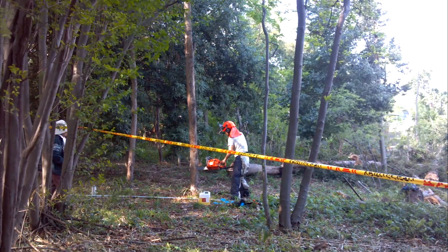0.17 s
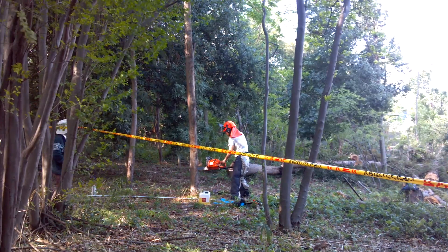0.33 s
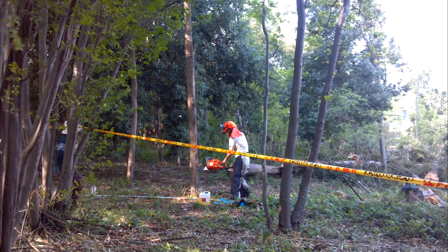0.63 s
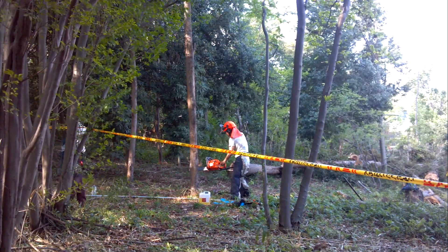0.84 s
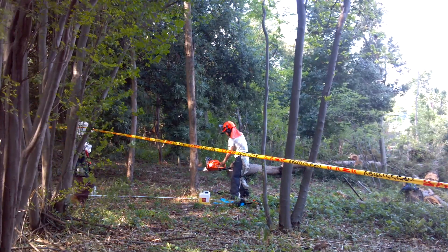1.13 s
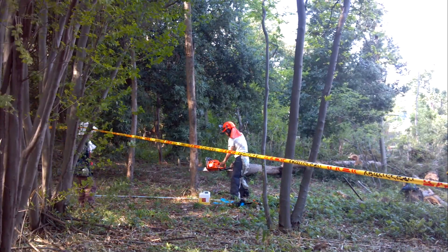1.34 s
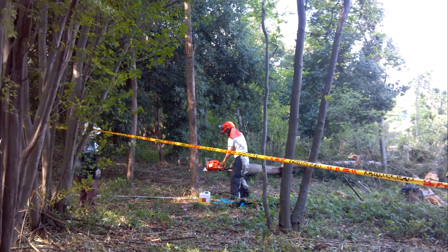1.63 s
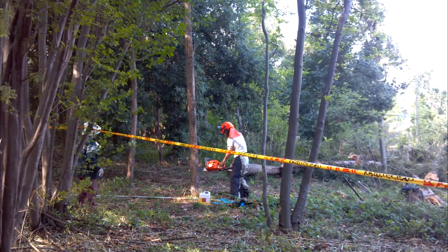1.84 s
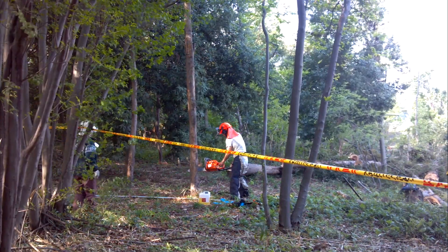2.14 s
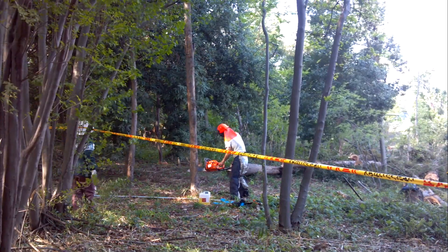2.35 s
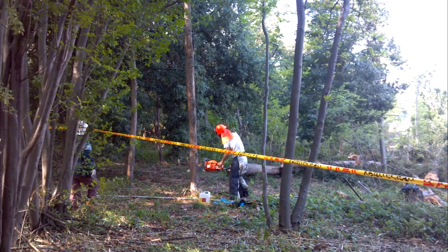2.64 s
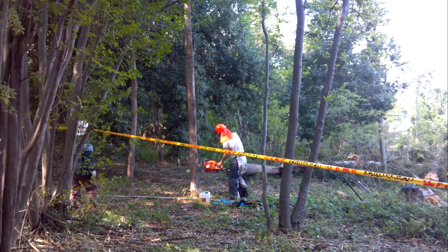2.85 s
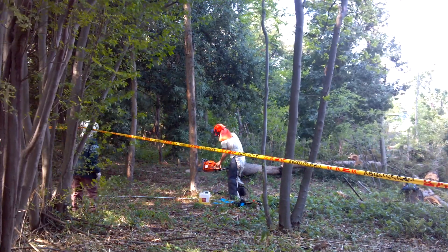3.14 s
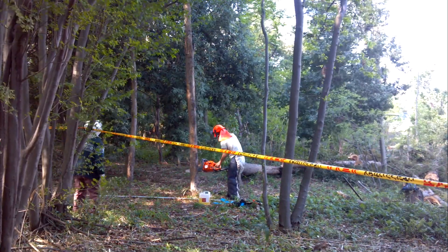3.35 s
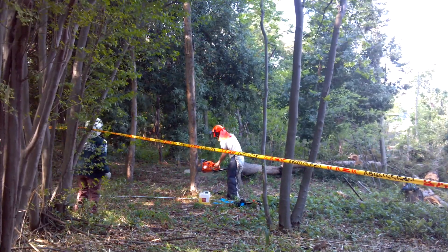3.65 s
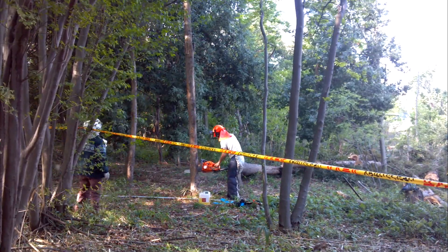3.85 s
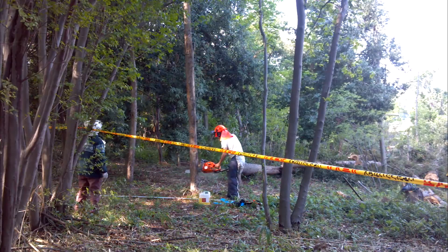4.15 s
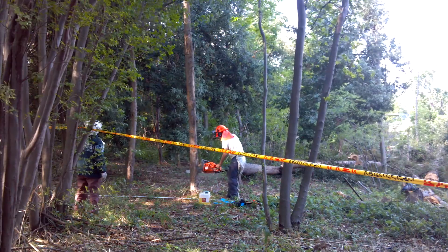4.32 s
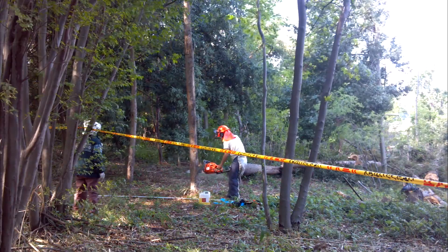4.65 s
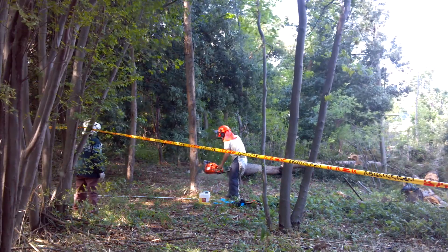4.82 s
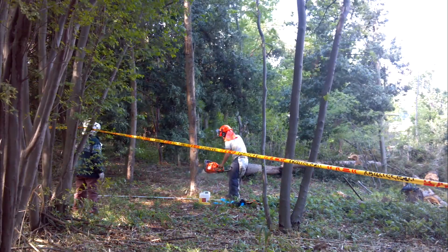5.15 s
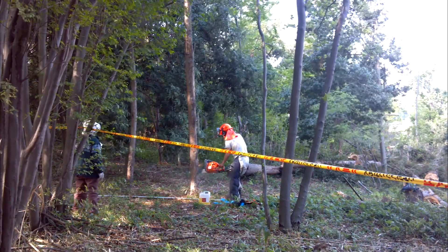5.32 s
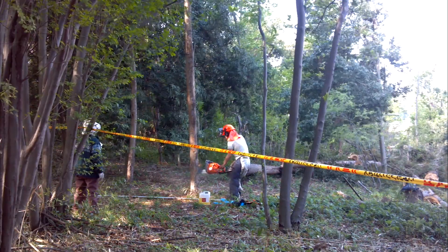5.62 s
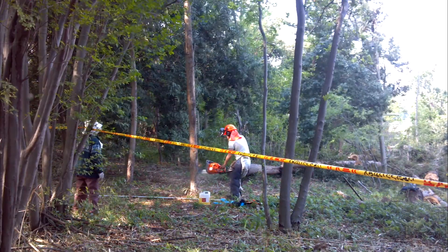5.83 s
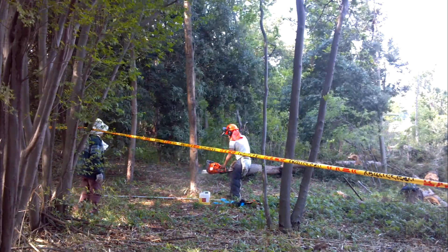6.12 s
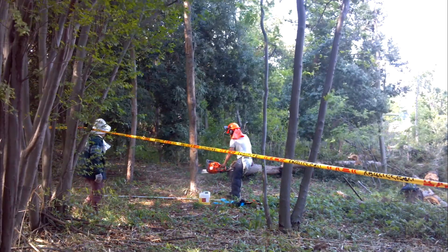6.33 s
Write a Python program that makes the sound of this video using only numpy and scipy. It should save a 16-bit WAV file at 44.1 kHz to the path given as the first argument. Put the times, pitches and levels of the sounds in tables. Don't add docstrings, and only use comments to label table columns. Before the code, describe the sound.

A small two-stroke engine pops weakly, then revs to a buzzing snarl with hissing chain. It slackens into a fluttering, stuttering burble, suddenly opens to a loud clean high scream, falls off, cracks once or twice and gives two sharp bursts. Heard from a distance among trees by a wide stereo microphone with low wind buffeting, mostly early on.

```python
import sys
import numpy as np
from scipy import signal
from scipy.fft import rfft, irfft, next_fast_len
from scipy.io import wavfile
from scipy.ndimage import uniform_filter1d, map_coordinates

SR = 44100
rng = np.random.default_rng(int(sys.argv[2]) if len(sys.argv) > 2 else 0)


def digitize_waveform(pressure):
    field = np.atleast_2d(pressure).T
    bounded = np.clip(field, -1, 1)
    quanta = np.round(bounded * 32767).astype(np.int16)
    wavfile.write(sys.argv[1], SR, quanta)


def volts(x):
    e = np.asarray(x, float) / 20
    return 10 ** e


N = 285768

# from t/s, period of firing [turns], roughness [0-1]
FIRING = [(0, 2, .6), (.3, 1, .8), (.44, 1, .15), (.85, 1, .28), (1.6, 1, .35), (1.85, 3, .22),
          (2.55, 3, .45), (2.92, 2, .18), (3.71, 1, 0), (5.15, 1, .45), (5.55, 1, .6), (5.71, 1, 0),
          (5.93, 1, .4), (6.07, 1, 0), (6.28, 1, .4), (6.42, 1, .1)]
# f/Hz, bandwidth/Hz, level/dB
MUFFLER = [(463, 16, -2), (587, 53.6, 4.5), (761, 83, 3), (1060, 55, -5), (1174, 123, -9)]
CROSS_LAG = 16
CHARGE_S = .04


def unit(x):
    return x / np.sqrt(np.mean(x ** 2) + 1e-20)


def along(points, hz, axis=1):
    p = np.array(points)
    return np.interp(np.log(hz + 1), np.log(p[:, 0] + 1), p[:, axis])


def curves(rows):
    s, *cols = np.transpose(rows)
    return [np.interp(np.arange(N) / SR, s, c) for c in cols]


def held(rows):
    rows = np.array(rows)
    row = np.searchsorted(rows[:, 0], np.arange(N) / SR, "right") - 1
    return rows[np.clip(row, 0, None), 1:].T


def between(ends, share):
    return ends[0] + share * (ends[1] - ends[0])


def wobble(rate):
    knots = rng.standard_normal(int(N * rate / SR) + 4)
    return map_coordinates(knots, [np.arange(N) * rate / SR])


def filtered(x, response):
    m = next_fast_len(N + SR // 2)
    return irfft(rfft(x, m) * response(np.fft.rfftfreq(m, 1 / SR)), m)[..., :N]


def modes(table):
    def response(f):
        total = 0
        for k, (c, width, db) in enumerate(table):
            total = total + (-1) ** k * volts(db) * 1j * f * width / (c * c - f * f + 1j * f * width)
        return total
    return response


def steady(x, span_s=0.066):
    return x / np.sqrt(np.abs(uniform_filter1d(x ** 2, int(span_s * SR))) + 1e-12)


def wind():
    # t/s, peak level/dB, pitch f/Hz
    puffs = [(0.054, -15.5, 152), (0.124, -21.5, 205), (0.161, -16, 117), (.223, -19, 146),
             (.358, -18, 130), (.412, -10, 194), (0.471, -19, 228), (0.522, -14, 273), (0.547, -7.5, 235),
             (0.562, -9, 170), (0.579, -11, 220), (0.598, -10, 143), (0.615, -5.5, 182), (0.805, -23, 232),
             (0.829, -23, 157.5), (0.975, -11.5, 153), (1.695, -19, 178), (1.732, -19, 157),
             (1.784, -14, 196), (2.222, -24, 181.5), (2.42, -23, 163.8), (2.794, -23, 118),
             (2.988, -10, 160.9), (3.051, -13.5, 177.9), (3.126, -24, 193), (3.375, -24, 110),
             (4.425, -32, 169.2), (5.561, -26, 169.4), (5.653, -22.5, 203.7), (5.733, -18, 129.8),
             (5.975, -19, 174.2), (6.152, -20, 139.7), (6.399, -24, 143.1)]
    # t/s, level/dB
    buffet_level = [(0, -39), (.3, -36.5), (.6, -29.5), (1.05, -31), (2.0, -38.5), (3.3, -36), (3.8, -41.5),
                    (5.3, -44), (5.65, -36), (5.85, -28.5), (6.1, -33.5), (6.48, -46)]
    # f/Hz, spectral level/dB per Hz
    rumble = [(20, -24), (50, -5), (100, -3.5), (170, -7.5), (300, -17), (500, -11), (900, -40)]
    out = np.zeros(N + SR)
    t = np.arange(-SR // 20, SR // 20) / SR
    for s, db, hz in puffs:
        length = 1.9 / hz
        swirl = 2 * np.pi * (hz * t * [[.7], [1.1], [1.6], [2.3]] + rng.random((4, 1)))
        spans = length * np.array([[.75], [.7], [.55], [.4]])
        shape = np.exp(-.5 * (t / spans) ** 2)
        puff = (shape * np.sin(swirl) * volts([[0], [-1], [-5], [-10]])).sum(0)
        out[round(s * SR):][:len(t)] += volts(db + .5) * puff / np.abs(puff).max()
    lumps = volts(2.5 * wobble(30) + 1.5 * wobble(6))
    noise = filtered(rng.standard_normal((2, N)), lambda f: volts(along(rumble, f)))
    buffet = volts(curves(buffet_level)[0]) * unit(lumps * noise)
    mean = out[SR // 20:][:N] + buffet[0]
    late = filtered(mean, lambda f: volts(-1) * np.exp(-1.05j) * f / (f + 60))
    return np.array([mean, late + volts(-13) * buffet[1]])


def trunks(x):
    # f/Hz, decay time t60/s
    decay = [(150, 0.78), (1000, 0.5), (5000, 0.06), (14000, 0.19)]
    hz, t, z = signal.stft(rng.standard_normal((2, SR // 2)), SR, nperseg=256)
    fading = z * volts(-60 * t / along(decay, hz)[:, None])
    tail = signal.istft(fading, SR, nperseg=256)[1]
    delayed = np.pad(x, (300, 0))[None]
    return signal.fftconvolve(delayed, tail / np.linalg.norm(tail[0]), axes=1)[:, :N]


def shaft_hum(turns, octaves, exhaust_db):
    hum_db = -32 + 9 * octaves + 0.46 * (exhaust_db - exhaust_db.mean())
    return volts(hum_db) * np.sin(2 * np.pi * turns)


def fan_whine(turns, speed_hz):
    sings_from_hz, db_per_hz = 138, 1.5
    whine_db = -37 - db_per_hz * np.maximum(sings_from_hz - speed_hz, 0)
    whine = np.sin(2 * np.pi * 20 * turns) * volts(2.5 * wobble(5))
    whine = whine + volts(-1 + 2.5 * wobble(5)) * np.sin(2 * np.pi * 12 * turns)
    for k in (9, 10, 11, 15, 28):
        whine = whine + volts(-5 + 3 * wobble(4)) * np.sin(2 * np.pi * k * turns)
    return volts(whine_db) * whine


def intake(pulses, octaves):
    # f/Hz, bandwidth/Hz, level/dB
    airbox = [(211, 50, 4.5), (550, 300, 1.5)]
    sound = steady(filtered(pulses, lambda f: modes(airbox)(f) / (1 + 1j * f / 600)))
    return volts(-5.5 - 8 * octaves) * sound


def cover_plate(blast, octaves):
    # f/Hz, bandwidth/Hz, level/dB
    plate_mode = (4140, 40, 0)
    scrape = (1.1 + blast) * volts(2.1 * wobble(20)) * rng.standard_normal(N)
    return volts(-19.5 + 2.5 * octaves) * unit(filtered(scrape, modes([plate_mode])))


def casing(pulses, blast, breath_db, octaves):
    # f/Hz, bandwidth/Hz, level/dB
    casing_modes = [(1538, 230, -4.5), (1674, 147, 2.5), (1838, 64, 3.5), (2520, 99, 9)]
    rattle = unit(filtered((0.11 + blast) * rng.standard_normal(N), modes(casing_modes)))
    knocks = unit(filtered(pulses, modes(casing_modes)))
    return volts(-11 + 2.5 * octaves) * steady(knocks + volts(breath_db / 2 + 5) * rattle)


def chain_hiss(blast):
    # f/Hz, spectral level/dB per Hz
    hiss_spectrum = [(300, -24), (700, -4), (1200, -2),
                     (2000, -3), (2700, -10.5), (3300, -5.5), (4200, -4), (6000, -7.5), (9000, -5), (12000, -9),
            (14500, -12.5), (16000, -21)]
    chatter = volts(0.89 * wobble(9) + 0.65 * wobble(45))
    noise = (2.7 + blast) * chatter * rng.standard_normal(N)
    return volts(-2) * steady(filtered(noise, lambda f: volts(along(hiss_spectrum, f))), span_s=0.13)


def chain_drive(pulses, blast, breath_db, octaves):
    # t/s, level/dB
    drive = [(0, -40), (.3, -42), (.55, -35.5), (.85, -27.5), (1.55, -25.5), (1.8, -28.5), (3.6, -28),
             (3.83, -25), (5.12, -25.5), (5.4, -35.5), (5.6, -38.5), (5.9, -23), (6.03, -27.5),
             (6.12, -25.5), (6.28, -25), (6.48, -30)]
    sound = chain_hiss(blast) + casing(pulses, blast, breath_db, octaves)
    sound = sound + cover_plate(blast, octaves) + intake(pulses, octaves)
    return volts(curves(drive)[0]) * sound


def cracks():
    # t/s, peak level/dB
    idle_firings = [
        (0.0767, -27),
        (0.1426, -25),
        (0.2044, -41),
        (0.3172, -21),
        (0.374, -17.5),
        (0.4094, -25),
        (0.4414, -25),
        (0.4953, -16),
        (5.5872, -19),
        (5.6256, -13),
    ]
    out, blows = np.zeros(N + SR), np.zeros(N)
    t = np.arange(SR // 20) / SR
    for s, db in idle_firings:
        out[round(s * SR):][:len(t)] += volts(db - 4.5 - 60 * t / .025) * rng.standard_normal(len(t))
        blows[round(s * SR)] = volts(db + 23.0)
    spit = filtered(out[:N], lambda f: 1 / (1 + 1j * f / 9000))
    return spit + filtered(blows, modes(MUFFLER))


def engine():
    # t/s, speed the crank then pulls toward f/Hz, charge burnt level/dB
    trigger = [(0, 46.6, -34), (.35, 123.3, -32), (.44, 197.8, -27.5), (.53, 97, -29.5),
               (.61, 148.6, -29.5), (.82, 137.2, -31), (.95, 116.9, -32), (1.22, 139.3, -30),
               (1.55, 79.5, -30.5), (2.01, 90.1, -27.5), (2.42, 96.86, -27), (2.58, 81.3, -26.5),
               (3.04, 87.7, -26.5), (3.56, 75.73, -26), (3.725, 187.1, -22), (3.86, 172.2, -24),
               (4.0, 154.3, -27), (4.3, 162.1, -26.5), (4.83, 155.6, -23), (4.97, 163.3, -25.5),
               (5.14, 30.08, -42), (5.58, 88.77, -30), (5.72, 235.1, -22.5), (5.89, 164.2, -25),
               (5.93, 64, -34), (6.09, 226.2, -21.5), (6.26, 160.9, -38), (6.29, 29.9, -40),
               (6.44, 133.8, -25)]
    start_hz, flywheel_s = 46, .32
    aim_hz, charge_db = held(trigger)
    keep = np.exp(-1 / (flywheel_s * SR))
    speed_hz = start_hz + signal.lfilter([1 - keep], [1, -keep], aim_hz - start_hz)
    return speed_hz, uniform_filter1d(charge_db, int(CHARGE_S * SR))


def firings(turns):
    unfired_db, fired_contrast = -8, 2.5
    scatter_db, jitter_turns = (.5, 2), (.002, .016)
    turn = np.arange(1, int(turns[-1]))
    every, rough = held(FIRING)[:, np.interp(turn, turns, np.arange(N)).astype(int)]
    luck = rng.standard_normal((N // 100, 2))[turn]
    missing = (-turn % every) / np.maximum(every - 1, 1)
    missing = missing ** 2
    luck_db = between(scatter_db, rough) * luck[:, 0]
    late = .03 * missing
    moment = turn + late + between(jitter_turns, rough) * luck[:, 1]
    at = np.interp(moment, turns, np.arange(N))
    whole = at.astype(int)
    share = at - whole

    def train(size):
        first = np.bincount(whole, size * (1 - share), N + 2)
        second = np.bincount(whole + 1, size * share, N + 2)
        return (first + second)[:N]

    pulses = train(volts(missing * unfired_db + luck_db))
    fired = train(volts(fired_contrast * missing * unfired_db + luck_db))
    return pulses, fired


def exhaust(pulses, fired, blast, breath_db):
    # from t/s, share of thump [0-1], gas heat [0-1], port bark over the charge level/dB
    voice = [(0, 0.8, 0.25, -20), (.44, 0.48, 0.2, -17.5), (.85, 0.32, 0.06, -9), (1.6, 0.37, 0.1, -27),
             (1.9, .15, 0.73, -23), (2.55, 0.19, 0.38, -26), (2.92, 0.26, 0.02, -17),
             (3.73, 0.85, 0.94, -14), (3.98, .4, 0.61, -19), (4.33, 0.07, 0.79, -13), (5.15, 0.1, 0.27, -1),
             (5.55, 0.37, 0.66, -13), (5.73, 0.92, 0.1, -21.5), (5.93, .5, 0, -11), (6.08, 0.88, 1, -19),
             (6.28, 0.37, 0.39, -1), (6.42, .7, 0.2, -15)]
    # f/Hz, bandwidth/Hz, level/dB
    hot_muffler = [(485, 42, -0.5), (620, 54, 5), (803, 62, 9), (973, 57, 0), (1310, 260, -12)]
    # f/Hz, bandwidth/Hz, level/dB
    thump_mode = [(690, 260, 0)]
    # f/Hz, bandwidth/Hz, level/dB
    bark_modes = [(775, 750, 0.5), (1180, 1050, 6), (1880, 1000, 6)]
    # delay t/s, level/dB
    reflections = [(.0037, -13), (.0063, -15), (.0152, -11)]
    open_share, heat, bark_db = uniform_filter1d(held(voice), int(CHARGE_S * SR), axis=1)
    open_share, heat = np.clip(open_share, 0, 1), np.clip(heat, 0, 1)

    def outlet(f):
        near = 1 + sum(volts(db) * np.exp(-2j * np.pi * f * s) for s, db in reflections)
        return near * (1j * f / 300) / (1 + 1j * f / 300)

    def throat(x):
        cool_and_hot = [(1 - heat) * x, heat * x]
        return filtered(cool_and_hot, lambda f: outlet(f) * [modes(MUFFLER)(f), modes(hot_muffler)(f)]).sum(0)

    breath = unit(throat((2.5 + blast) * rng.standard_normal(N)))
    ring = steady(unit(throat(pulses)) + volts(breath_db) * breath)
    thump = steady(filtered(pulses, lambda f: modes(thump_mode)(f) / (1 + 1j * f / 1100) ** 2))
    body = np.sqrt(open_share) * thump - np.sqrt(1 - open_share) * ring
    bark = steady(filtered(fired, lambda f: modes(bark_modes)(f) * (1j * f / 500 / (1 + 1j * f / 500)) ** 2))
    return volts(-1) * body - volts(bark_db) * bark


def saw():
    speed_hz, charge_db = engine()
    octaves = np.log2(speed_hz / 100)
    rough = uniform_filter1d(held(FIRING)[1], int(CHARGE_S * SR))
    breath_db = between((-24, -4), rough)
    turns = .5 + np.cumsum(speed_hz * (1 + .002 * wobble(14))) / SR
    exhaust_db = charge_db + 6 * octaves
    pulses, fired = firings(turns)
    t = np.arange(SR // 20) / SR
    blast = unit(signal.fftconvolve(fired, np.exp(-t / .005))[:N])
    sound = volts(exhaust_db) * exhaust(pulses, fired, blast, breath_db)
    sound = sound + shaft_hum(turns, octaves, exhaust_db) + fan_whine(turns, speed_hz)
    return sound + cracks() + chain_drive(pulses, blast, breath_db, octaves)


def scene():
    # f/Hz, level/dB, phase/rad
    ports = [(130, -10, 1), (350, -17, 1.1), (700, -11, 1.3), (1050, -11, 1.3), (1500, 3, .7),
             (2300, -1, .5), (3300, -1, .2), (4500, .5, 0), (9000, 0, 0), (12000, -2, 0), (14500, -6, 0),
             (16000, -12, 0)]
    # f/Hz, level/dB
    scatter_aside = [(130, -24), (700, -17), (1100, -11), (1800, -7), (4000, -1), (9000, -3), (14000, 0)]
    # f/Hz, level/dB
    scatter_front = [(130, -24), (800, -16), (2000, -10), (8000, -8)]

    def port_response(f):
        lean_rad = .6 * np.sin(2 * np.pi * f * CROSS_LAG / SR)
        return volts(along(ports, f)) * np.exp(1j * (along(ports, f, axis=2) - lean_rad))

    direct = saw()
    echo = trunks(direct)
    aside = filtered(direct, port_response)
    aside = aside + filtered(echo[1], lambda f: volts(along(scatter_aside, f)))
    front = direct + filtered(echo[0], lambda f: volts(along(scatter_front, f)))
    mean, difference = np.array([front, aside]) + wind()
    return np.array([mean + difference, mean - difference])


def roll_off(x):
    return signal.sosfilt(signal.butter(12, 16830, fs=SR, output="sos"), x)


def record(dry):
    wide = dry - np.pad(dry[::-1], ((0, 0), (CROSS_LAG, 0)))[:, :N]
    wide = wide / (1 + np.abs(wide / .97) ** 8) ** (1 / 8)
    wide = filtered(wide, lambda f: f < 15900)
    return roll_off(wide)


dry = scene()
out = record(dry)
digitize_waveform(out)
```